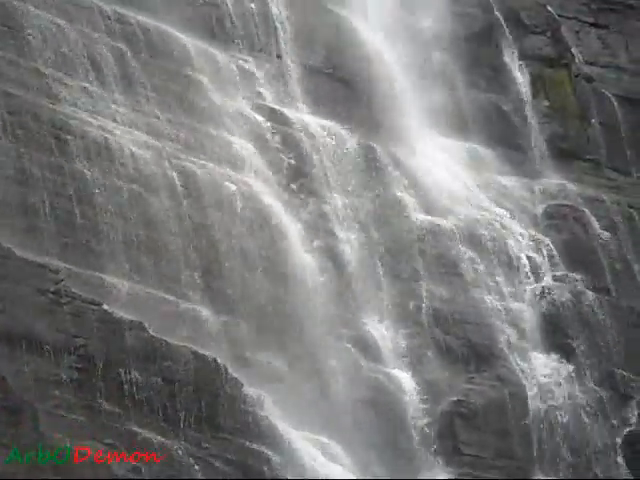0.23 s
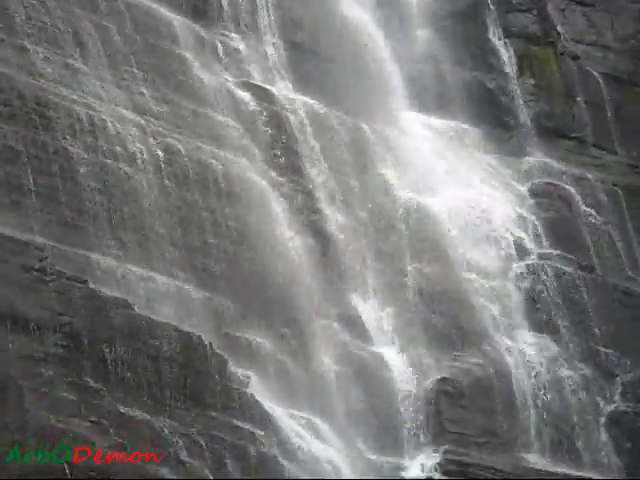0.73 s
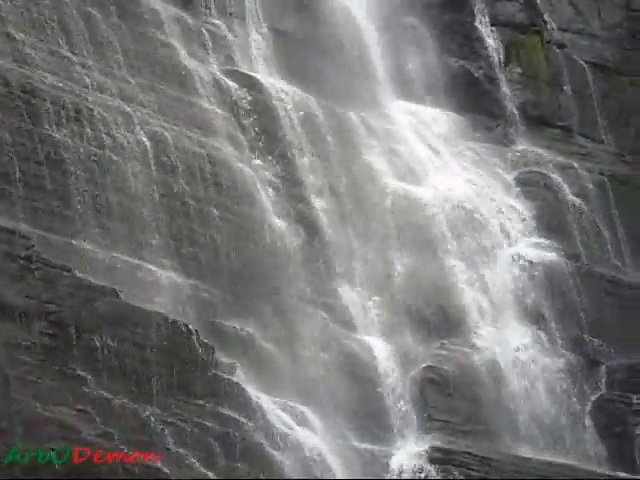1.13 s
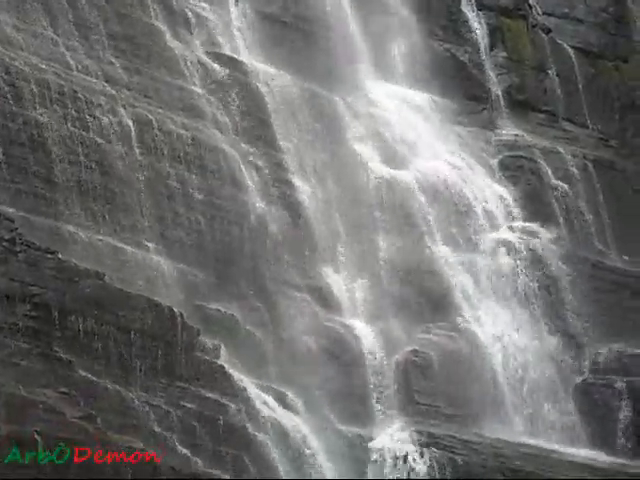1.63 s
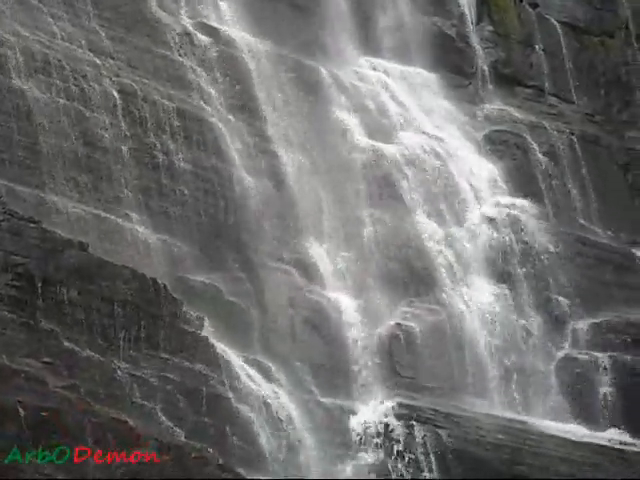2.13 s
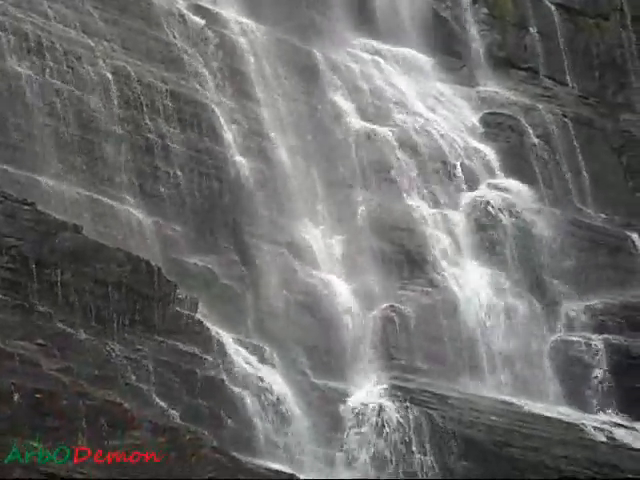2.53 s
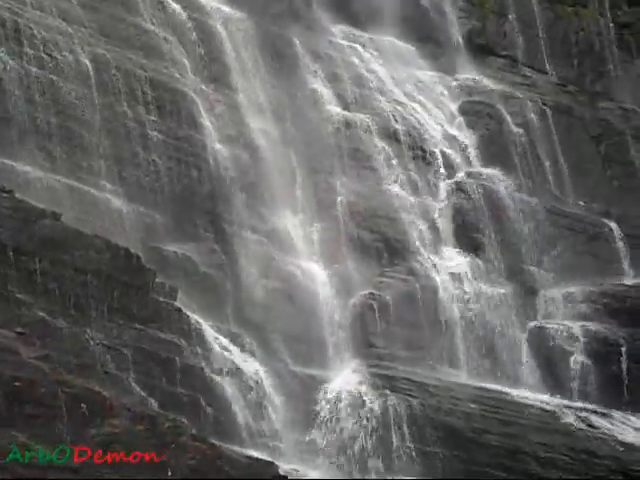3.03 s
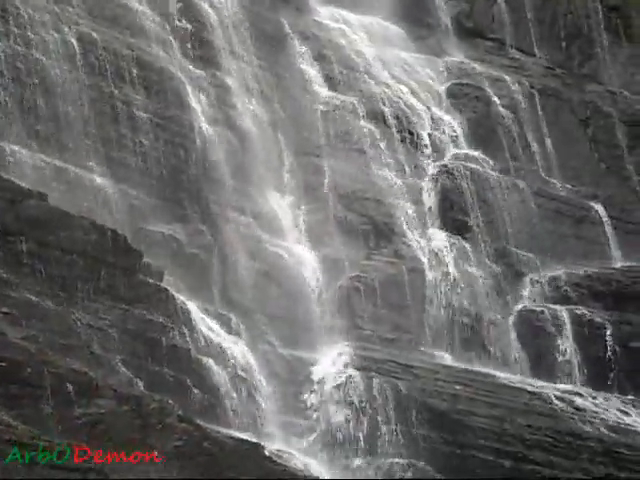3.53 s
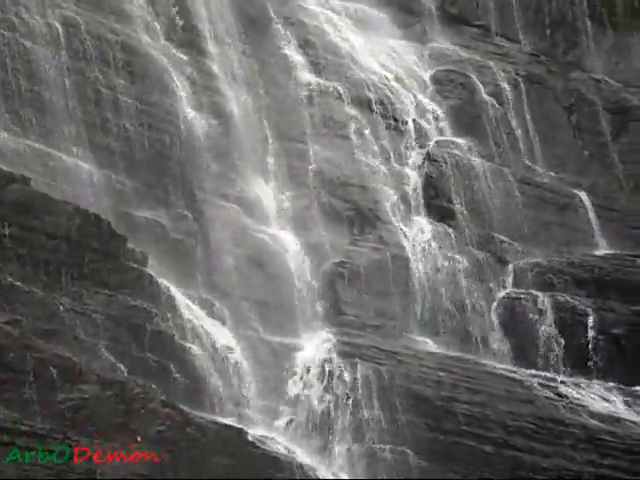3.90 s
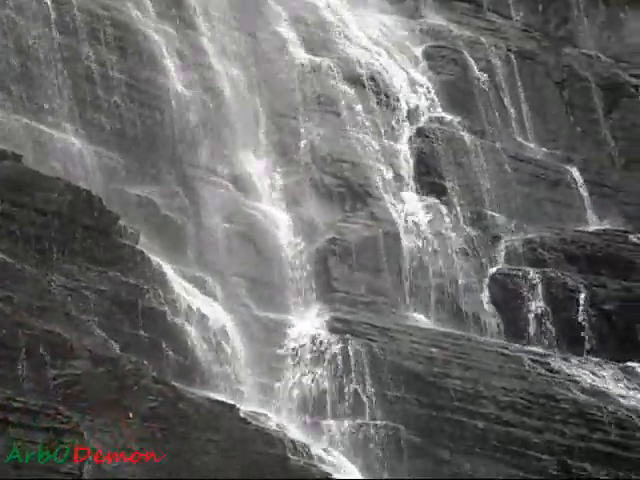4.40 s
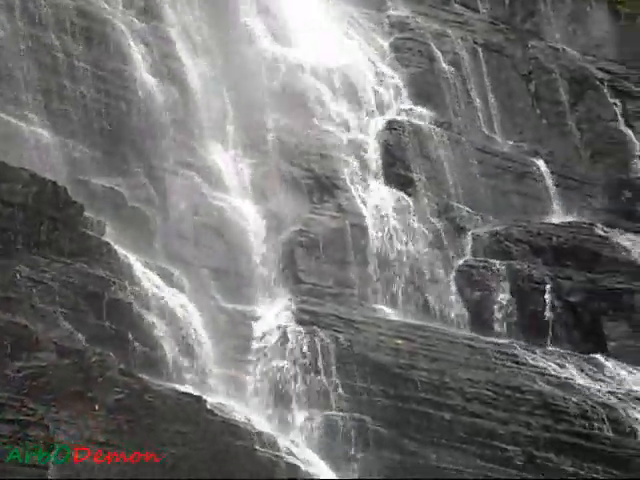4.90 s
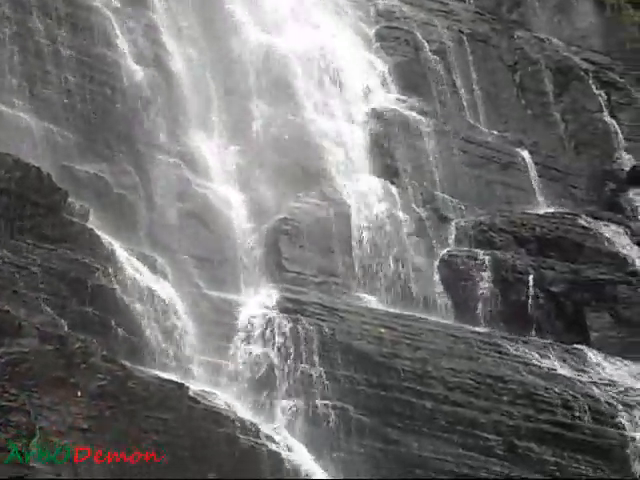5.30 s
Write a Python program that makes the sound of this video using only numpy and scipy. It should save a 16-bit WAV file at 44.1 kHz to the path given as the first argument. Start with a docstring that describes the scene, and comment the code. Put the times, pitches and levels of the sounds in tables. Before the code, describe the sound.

Continuous dense roar of falling water heard from some way off, while a light breeze briefly buffets the microphone about halfway through.

```python
"""A tall waterfall pours down stepped rock faces throughout, heard in mono from some way off.
Filtered noise is the rush of distant sheets, decaying sines ring as foam bubbles, noise splats are spray.
A light breeze adds low turbulent noise at the microphone: a faint puff early on, then a slow swell
carrying two short gusts near the middle, then a few weaker puffs towards the end."""
import sys
import numpy as np
from scipy import signal
from scipy.fft import rfft, irfft
from scipy.io import wavfile

SR = 44100
rng = np.random.default_rng(int(sys.argv[2]) if len(sys.argv) > 2 else 0)


def generate_wav(sig):
    """Save sig (samples, or channels by samples) to the path in sys.argv[1] as 16-bit PCM at SR."""
    pcm = np.round(np.clip(np.atleast_2d(sig).T, -1, 1) * 32767).astype(np.int16)
    wavfile.write(sys.argv[1], SR, pcm)


N = 244755

# Puffs of wind on the microphone: peak_s, length_s, level_db
WIND_PUFFS = [ (0.71, .05, -49), (1.878, 0.085, -44), (2.205, 0.091, -34), (2.446, .021, -34.5),
              (2.535, 0.058, -32.5), (2.618, .02, -39.5), (2.806, 0.028, -42), (3.376, .022, -40.5),
              (4.524, 0.078, -47.5), (4.81, .1, -50.5), ]
# Spectral outline of the falling water: frequency_hz, density_db (relative, per Hz)
WATER_SPECTRUM = [(25, -6.5), (110, -8), (380, -5.5), (510, -7.5), (780, -1.5), (1080, -0.7), (1290, -4),
                  (1900, -1.04), (3500, -3.5), (4500, -6.5), (5700, -7), (7000, -12.5), (12800, -15.5),
                  (15500, -17)]
# Flow over the ledges: time_s, level_db
FLOW_LEVEL = [(0, -32), (2.9, -32), (3.8, -32.5), (4.95, -32.5), (5.3, -32)]
# Low-mid band where water lands in the pools: time_s, extra_db
POOL_LEVEL = [(0, -0.5), (2.0, -0.0), (2.42, 1.5), (2.75, -0.8), (3.4, 1.0), (4.05, 0), (5.55, 0.0)]
POOL_HZ, POOL_WIDTH_OCT = 920, 0.49

# The slow swell of air that carries the strongest puffs
SWELL_AT_S, SWELL_LENGTH_S, SWELL_DB, SWELL_EDGE_HZ = 2.43, 0.56, -46.5, 70
# A puff of reference level and length sheds eddies up to EDDY_HZ; stronger, briefer ones reach higher
EDDY_HZ, EDDY_DB_PER_OCT, BREVITY_EXPONENT = 120, 14, 0.31
REFERENCE_PUFF_DB, REFERENCE_PUFF_S = -40, 0.03
# Share of a puff's length spent building up; it drops away faster
RISE_SHARE = 0.66
# Finer eddies at a puff's height: upper edge as a multiple of the main one, relative level in dB
FINE_RATIO, FINE_DB = 1.8, -6.5

# Recorder response: treble notch and upper limit
NOTCH_HZ, NOTCH_WIDTH_HZ, NOTCH_DB = 11040, 1450, -13.5
TOP_HZ = 15750


def undb(db):
    """Logarithmic level: 20 dB is a tenfold amplitude ratio."""
    return 10 ** (np.asarray(db) / 20)


def unit(x):
    """Energy normalisation: scale to rms 1."""
    return x / np.sqrt(np.mean(x ** 2))


def curve(rows):
    """Linear interpolation: join (time_s, value) rows, one value a sample."""
    return np.interp(np.arange(N) / SR, *np.transpose(rows))


def bins():
    """Discrete spectrum: frequency of each bin in Hz, with zero replaced by the first step."""
    return np.maximum(np.arange(N // 2 + 1), 1) * SR / N


def colour(x, points):
    """Linear filtering: weight the spectrum by a (frequency_hz, db) outline."""
    hz, db = np.transpose(points)
    outline_db = np.interp(np.log(bins()), np.log(hz), db)
    return irfft(rfft(x) * undb(outline_db), N)


def walk(rate_hz):
    """Band-limited randomness: smooth drift of rms 1, changing about rate_hz times a second."""
    lowpass = 1 / (1 + (bins() / rate_hz) ** 4)
    return unit(irfft(rfft(rng.standard_normal(N)) * lowpass, N))


def eddies(edge_hz, low_hz=44, suction=0.14):
    """Turbulence spectrum up to an edge; each core sucks, so troughs are sharp and crests round."""
    hz = bins()
    low_cut = hz / np.hypot(hz, low_hz)
    high_cut = 1 / np.sqrt(1 + (hz / edge_hz) ** 4.6)
    pressure = unit(irfft(rfft(rng.standard_normal(N)) * low_cut * high_cut, N))
    return pressure - suction * (pressure ** 2 - 1)


def puff(at_s, length_s, db, edge_hz):
    """Wind-induced pressure: air builds up on the port, is brightest at its height and drops away."""
    t = np.arange(N) / SR
    width_s = length_s * np.where(t < at_s, RISE_SHARE, 1 - RISE_SHARE)
    envelope = np.exp(-0.5 * ((t - at_s) / width_s) ** 2)
    # the squared envelope concentrates the finer eddies at the peak
    fine = undb(FINE_DB) * envelope ** 2 * eddies(FINE_RATIO * edge_hz)
    pressure = envelope * (eddies(edge_hz) + fine)
    # give the pressure the energy of its envelope
    match = np.sqrt(np.sum(envelope ** 2) / np.sum(pressure ** 2))
    return undb(db) * pressure * match


def breeze():
    """Eddy scaling: faster, more sudden air sheds smaller eddies and reaches higher frequencies."""
    out = puff(SWELL_AT_S, SWELL_LENGTH_S, SWELL_DB, SWELL_EDGE_HZ)
    for at_s, length_s, db in WIND_PUFFS:
        strength = 2 ** ((db - REFERENCE_PUFF_DB) / EDDY_DB_PER_OCT)
        brevity = (REFERENCE_PUFF_S / length_s) ** BREVITY_EXPONENT
        out += puff(at_s, length_s, db, EDDY_HZ * strength * brevity)
    return out


def impacts(per_s, spread_db):
    """Random arrivals: drops land independently, many small and a few large."""
    lands = rng.random(N) < per_s / SR
    size = undb(spread_db * np.minimum(rng.exponential(size=N), 4))
    return unit(lands * size * rng.choice([-1, 1], N))


def spray(per_s, splat_s):
    """Impact noise: each drop bursts on the rock in a very short, decaying splat."""
    splat = np.exp(-np.arange(SR // 100) / SR / splat_s)
    energy = signal.fftconvolve(impacts(per_s, spread_db=2.5) ** 2, splat)[:N]
    return unit(np.sqrt(np.abs(energy)) * rng.standard_normal(N))


def foam(per_s, cycles, count=48):
    """Bubble resonance: each size rings for some cycles, rising in pitch as it nears the surface."""
    out = np.zeros(N)
    for hz in np.geomspace(400, 6500, count):
        age_s = np.arange(int(2 * cycles * SR / hz)) / SR
        life = age_s * hz / cycles
        tone = np.sin(2 * np.pi * hz * age_s * (1 + 0.057 * life))
        ring = np.exp(-np.pi * life) * tone
        # small bubbles are more plentiful than large ones
        births = impacts(per_s * hz / 1000, spread_db=1.5)
        out += np.sqrt(hz) * unit(signal.fftconvolve(births, ring)[:N])
    return unit(out)


def surge(x, sway_db, flutter_db, mist_hz, count=18):
    """Band modulation: sheets tear and regather, so each band sways and flutters; pools swell apart."""
    octave, spectrum, pool_db = np.log2(bins()), rfft(x), curve(POOL_LEVEL)
    centres = np.linspace(np.log2(60), np.log2(TOP_HZ), count)
    out = np.zeros(N)
    # each row of the identity matrix picks one triangular band
    for centre, pick in zip(centres, np.eye(count)):
        band = irfft(spectrum * np.interp(octave, centres, pick), N)
        in_pool = np.exp(-0.5 * ((centre - np.log2(POOL_HZ)) / POOL_WIDTH_OCT) ** 2)
        # the finest mist hisses more evenly than the heavy water
        heavy = 1 / (1 + (2 ** centre / mist_hz) ** 2)
        motion_db = sway_db * walk(4.3) + flutter_db * walk(15)
        out += band * undb(heavy * motion_db + in_pool * pool_db)
    return out


def waterfall():
    """Superposition: countless far splashes blur into a rush; nearer foam and spray add a fine grain."""
    rush = rng.standard_normal(N)
    bubbles = undb(-11.5) * foam(per_s=35, cycles=10.3)
    drops = undb(-6) * spray(per_s=2200, splat_s=0.0004)
    water = unit(colour(rush + bubbles + drops, WATER_SPECTRUM))
    water = surge(water, sway_db=0.06, flutter_db=0.76, mist_hz=5000)
    slosh_db = 0.07 * walk(17)
    return water * undb(curve(FLOW_LEVEL) + slosh_db)


def scene():
    """Pressure addition: wind and water sum at one microphone, which feeds both channels."""
    mono = breeze() + waterfall()
    return np.array([mono, mono])


def record(dry):
    """Frequency response: the recorder has a high-treble notch and cuts the top steeply."""
    hz = bins()
    offset = 2j * (hz - NOTCH_HZ) / NOTCH_WIDTH_HZ
    notch = (undb(NOTCH_DB) + offset) / (1 + offset)
    top = 1 / np.sqrt(1 + (hz / TOP_HZ) ** 400)
    return irfft(rfft(dry) * notch * top, N)


dry = scene()
out = record(dry)
generate_wav(out)
```